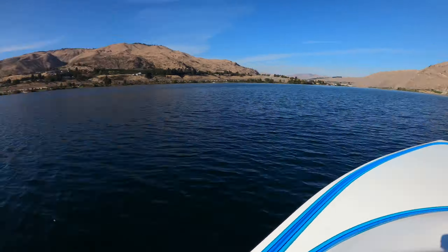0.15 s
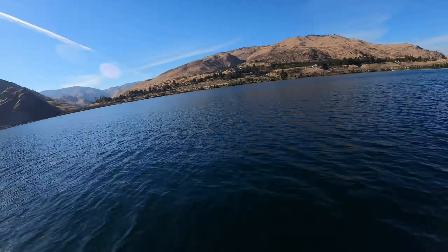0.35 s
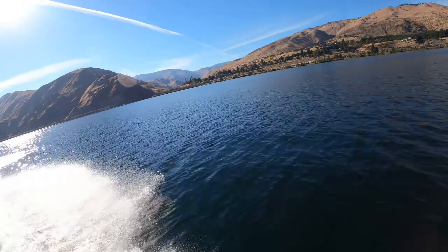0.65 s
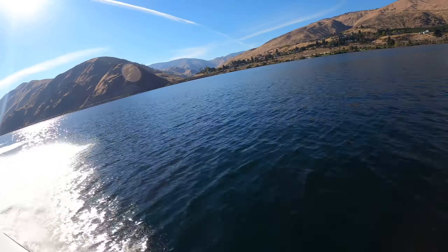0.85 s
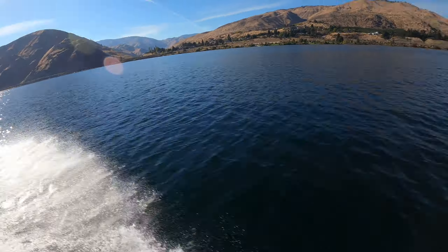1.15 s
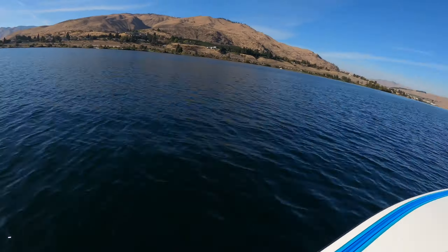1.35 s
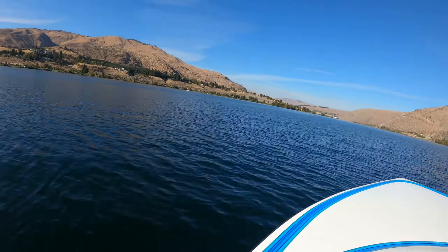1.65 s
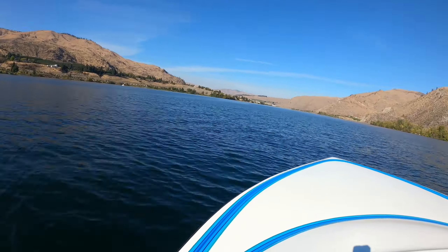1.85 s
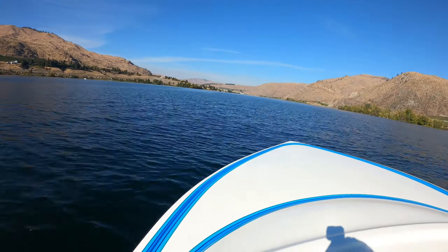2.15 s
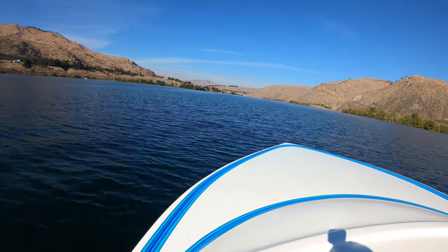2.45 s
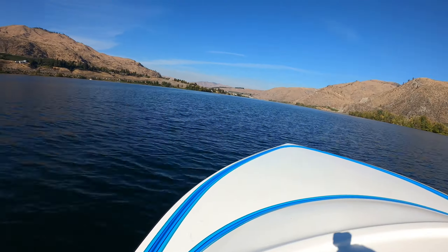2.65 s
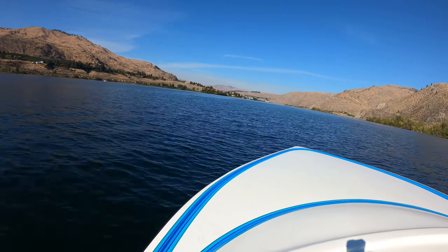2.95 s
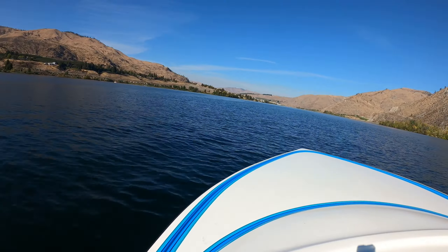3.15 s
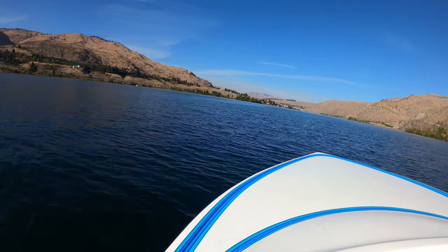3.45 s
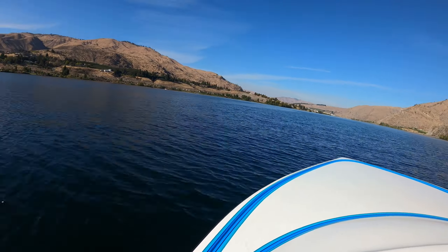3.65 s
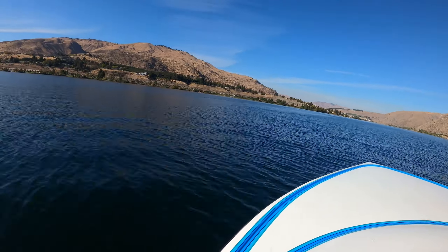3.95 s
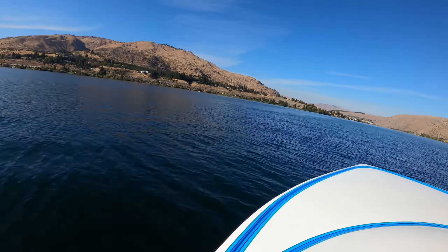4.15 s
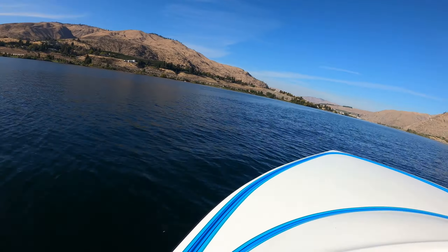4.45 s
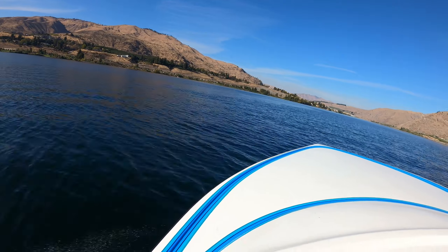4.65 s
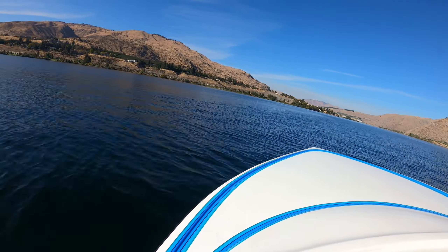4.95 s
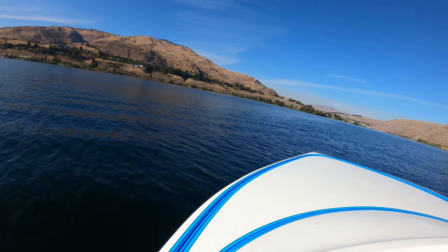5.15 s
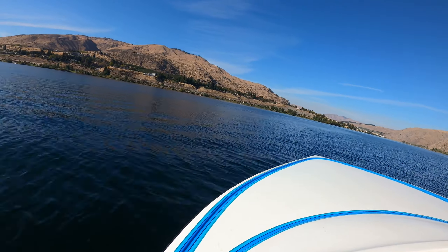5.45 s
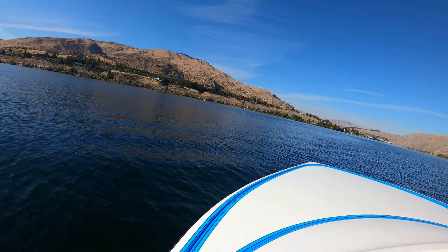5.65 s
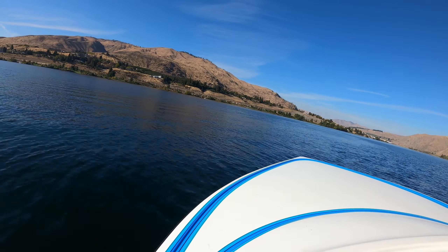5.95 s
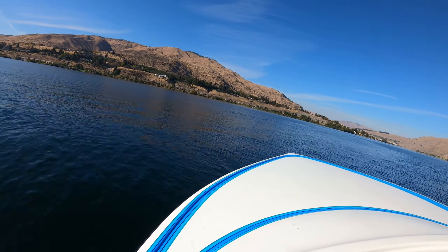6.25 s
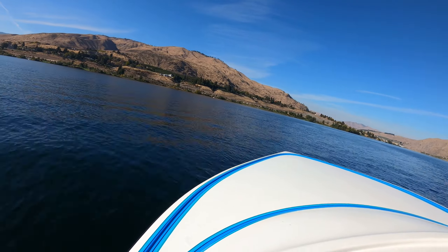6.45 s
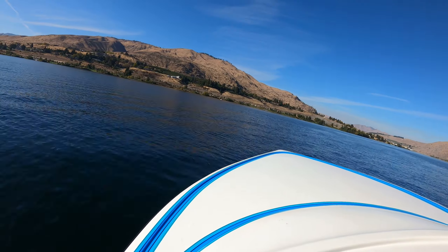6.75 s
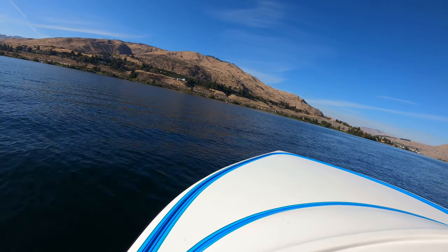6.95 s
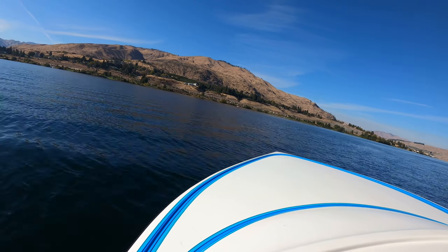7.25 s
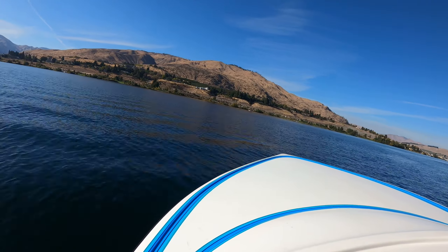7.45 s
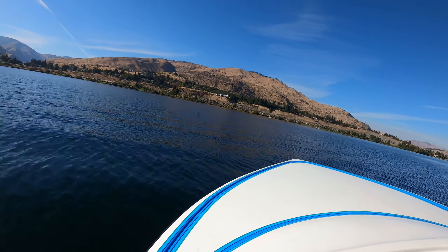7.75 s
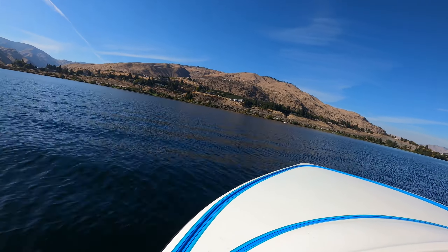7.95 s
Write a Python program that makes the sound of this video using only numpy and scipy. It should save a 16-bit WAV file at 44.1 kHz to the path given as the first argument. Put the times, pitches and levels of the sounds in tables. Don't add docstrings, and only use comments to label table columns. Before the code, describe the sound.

On a wide river, heard at the driver's head: a loud, low, buzzing engine note with rough water roar underneath. Early, the head turns into the airstream, giving ragged wind thumps, breathy hiss and sharp little spray ticks while the engine recedes. The wind drops away by two seconds. Steady cruising follows, then throttle surges around four and a half and five seconds lead to a sustained higher drone to the end.

```python
import sys
import numpy as np
from scipy import signal
from scipy.fft import rfft, irfft, next_fast_len
from scipy.io import wavfile
from scipy.ndimage import uniform_filter1d

SR = 44100
rng = np.random.default_rng(int(sys.argv[2]) if len(sys.argv) > 2 else 0)


def volts_from_decibels(level):
    exponent = np.asarray(level, float) / 20
    return 10 ** exponent


def store_pcm(level_fs):
    pcm = np.round(np.clip(level_fs, -1, 1) * 32767).astype(np.int16)
    wavfile.write(sys.argv[1], SR, np.atleast_2d(pcm).T)


N = 357210
TIME = np.arange(N) / SR

# (multiple of the cycle, level [dB])
CRUISE_TONES = [(1, -29), (2, -16), (3, 1), (4, -16.5), (5, -9.5), (6, -23.5), (7, -31.5), (8, 4),
                (9, -14.5), (10, -11.5), (11, -5), (12, -31.5), (13, -9), (14, -16), (15, -34), (16, -13),
                (17, -33.5), (18, -30.5), (19, -18.5), (20, -23), (21, -17), (22, -21.5), (23, -19.5),
                (24, -18.5), (25, -30), (26, -28), (27, -35), (28, -33.5), (29, -31.5), (30, -22)]
# (multiple of the cycle, level [dB])
PUSHED_TONES = [(1, -28), (2, -3), (3, 1), (4, -10), (5, -15), (6, -24.5), (7, -10.5), (8, 4), (9, -10),
                (10, -6.5), (11, -3), (12, -18), (13, -9.5), (14, -20.5), (15, -21.5), (16, -10),
                (17, -23.5), (18, -10.5), (19, -13.5), (20, -20), (21, -15.5), (22, -23), (23, -22.5),
                (24, -27), (25, -22), (26, -17), (27, -28.5), (28, -23.5), (29, -21.5), (30, -23.5)]
CRUISE_COMB_DB = [5.5, 2, -3, 5, 4, 4.5, -4, -6]
PUSHED_COMB_DB = [-1, 3.5, -6, 2.5, 6.5, -7.5, -0.5, -1]
FIRING_ORDER = np.array([1, 8, 4, 3, 6, 5, 7, 2])
# (frequency [Hz], gain [dB])
HULL = [(50, -6), (80, 0), (170, -4), (230, 0), (450, 0), (570, -6), (640, 0), (800, 0), (870, -7),
        (990, 0), (1250, 0), (1350, -5), (1700, -4), (2400, -10)]
# (frequency [Hz], density [dB per Hz])
ROAR_COLOUR = [(20, -29), (47, -10), (90, -5.5), (200, -12.5), (350, -14.5), (700, -18.5), (895, -24),
               (1050, -23.5), (1600, -28), (1780, -35), (4500, -59.5), (8000, -62.5), (10000, -71.5),
               (15500, -91.5)]
# (frequency [Hz], density [dB per Hz])
RASP_COLOUR = [(1900, -29.5), (2180, -3.5), (2300, -3), (2420, -15.5), (2800, -32)]
# (frequency [Hz], density [dB per Hz])
HISS_COLOUR = [(500, -26.5), (900, -2.5), (1800, -8), (3200, -14.5), (5000, -22), (7800, -31.5),
               (9500, -42), (12000, -51.5), (15500, -71.5)]
# (frequency [Hz], density [dB per Hz])
BUFFET_COLOUR = [(20, -11), (40, 2), (70, 0), (150, -1), (330, -2.5), (650, -15), (1200, -22),
                 (2500, -51.5)]
# (time [s], engine cycle rate [Hz])
LEVER = [(0, 32.22), (.4, 32.38), (.81, 33.3), (1.06, 36.02), (1.69, 32.55), (2.05, 31.96), (2.55, 32.41),
         (2.77, 33.49), (3.83, 32.49), (4.23, 33.53), (4.46, 39.13), (4.9, 35.02), (5.1, 38.53),
         (5.49, 35.16), (5.75, 38.42), (6.81, 38.78), (7.71, 39.4), (8.1, 40.14)]
# (peak time [s], rate change [Hz], half
# length [s])
SKIPS = [
    (0.24, -0.31, .18),
    (0.599, 1.3, .24),
    (1.874, .9, .18),
    (2.306, 0.84, .24),
    (3.266, -0.074, 0.24),
    (4.657, -0.3, 0.2016),
    (5.319, -0.66, 0.135),
    (6.075, -.35, .35),
    (7.221, 1.62, .58),
    (7.953, 0.84, 0.25),
]
# (time [s], level [dB], load [dB], head turned from the pipes [0-1, clipped])
EFFORT = [(0, -19, 0.5, 0.24), (.45, -20.5, 3.5, 0), (.6, -23, 4.5, 0.1), (1.1, -23, -0.5, 2.5),
          (1.35, -28.5, 3, 3), (1.65, -22.5, 0.5, 0.86), (2.05, -19, 0.5, 0.25), (3.1, -18.5, 2.5, 0.03),
          (3.83, -19.5, 2, 0.13), (4.26, -17.5, 2.5, 0.02), (4.45, -18.5, 0.5, 0.28),
          (4.88, -17.5, 4, 0.07), (5.1, -18, 2.5, 0.12), (5.55, -16, 3.5, 0.11), (5.75, -17.5, 2, 0.07),
          (6.8, -18, 3, 0), (7.35, -18, 3, 0.01), (8.1, -19.5, 3, 0)]
# (start [s], length [s], hiss [dB], brightness [dB], buffeting [dB])
GUSTS = [(0, .01, -49, -8, -13), (0.375, .03, -44, 3, -29), (0.396, 0.025, -38.5, -10, -27),
         (0.458, .025, -40, 4.5, -19), (0.499, .03, -36, -16, -18), (0.613, .15, -38, -11, -15),
         (0.782, 0.059, -37, -12.5, -19), (0.862, .09, -39.5, -4.5, -18), (.96, 0.087, -37.5, -12, -16),
         (1.084, 0.11, -38, -6.5, -17.5), (1.216, 0.054, -40.5, -7.5, -16), (1.272, .07, -41.5, -13.5, -15),
         (1.355, .015, -35, -12, -18), (1.399, 0.038, -39, -7.5, -17), (1.495, 0.053, -35.5, -10.5, -20.5),
         (1.587, 0.072, -39.5, 2, -31.5), (1.658, .04, -38.5, -6, -32.5), (1.724, 0.076, -42.5, -13, -23.5),
         (1.79, .22, -44, -9, -60), (3.98, .53, -48, -10, -61.5), (4.14, 0.21, -47.5, -7.5, -23),
         (4.85, 0.11, -50, -12, -50), (5.2, 1.53, -57.5, -1.5, -49), (5.46, 0.14, -55, -11, -50)]
# (time [s], peak [dB])
TICKS = [(0.3561, -36), (0.4243, -26), (0.5222, -27), (0.631, -30), (0.653, -27), (0.701, -19.5),
         (0.7405, -28), (0.7555, -26), (0.79, -31), (0.823, -26), (0.855, -24), (0.8584, -28), (1.037, -24),
         (1.0688, -28), (1.2785, -32), (1.2946, -35), (1.3268, -28), (1.3523, -31), (1.3694, -20),
         (1.4017, -22), (1.4486, -32), (1.4688, -30), (1.512, -31), (1.739, -33), (1.7992, -35),
         (4.017, -34), (4.0961, -33), (4.203, -40), (4.2428, -36), (4.4033, -35)]

CRUISE_HZ, PUSHED_HZ, OPENING_HZ = 32.57, 38.4, (33.4, 36.22)
# (start [dB], fall [dB per multiple])
CRUISE_TOP_DB, PUSHED_TOP_DB = (-29, .4), (-29, 0.31)
LOPE_DB, LOPE_DB_PER_LOAD_DB, BARK_DB, BARK_DB_PER_LOAD_DB = 1.05, 0.73, -7.5, 1.23
SHADE_DB = -8
TORN_DB, TORN_FROM_DB = 2.5, (-24, -22)
HISS_DB_PER_S, BUFFET_DB_PER_S = (630, 230), (300, 91)
CALM_DB, CALM_BRIGHT_DB, CALM_DB_PER_LOAD_DB, STILL_DB = -59, -6, 0.92, -45.5


def columns(table):
    s, *rest = np.transpose(table)
    return [np.interp(TIME, s, c) for c in rest]


def walk(rate_hz, time=TIME):
    steps = np.repeat(rng.standard_normal(int(N / SR * rate_hz) + 3), 8)
    smooth = uniform_filter1d(uniform_filter1d(steps, size=8), size=8)
    return 0.79 * np.interp(time * rate_hz * 8, np.arange(len(smooth)), smooth)


def bands(colour, source):
    size = next_fast_len(N)
    octave = np.log2(np.maximum(np.arange(size // 2 + 1) * SR / size, 1))
    hz, db = np.transpose(colour)
    shaped = rfft(source, size) * volts_from_decibels(np.interp(octave, np.log2(hz), db, left=-90, right=-90))
    shaped /= np.std(irfft(shaped, size))
    centres = np.arange(np.floor(np.log2(hz[0])), np.log2(hz[-1]) + 1)
    return [(2 ** c, irfft(shaped * np.clip(1 - abs(octave - c), 0, 1), size)[:N]) for c in centres]


def gusts(level_db, slopes_db_per_s):
    start, length = np.transpose(GUSTS)[:2, :, None]
    time = TIME[::32]
    rise_db_per_s = slopes_db_per_s[0] / (1 + length / .08)
    fade_db = rise_db_per_s * np.maximum(start - time, 0)
    fade_db = fade_db + slopes_db_per_s[1] * np.maximum(time - start - length, 0)
    return volts_from_decibels(2 * (level_db[:, None] - fade_db))


def wind(load_db):
    hiss_db, bright_db, buffet_db = np.transpose(GUSTS)[2:]
    blow = gusts(hiss_db, HISS_DB_PER_S)
    calm = volts_from_decibels(2 * (CALM_DB + CALM_DB_PER_LOAD_DB * load_db[::32]))
    total = blow.sum(axis=0) + calm
    mean_bright_db = (bright_db @ blow + CALM_BRIGHT_DB * calm) / total
    thump = gusts(buffet_db, BUFFET_DB_PER_S).sum(axis=0) + volts_from_decibels(2 * STILL_DB)
    coarse = 10 * np.log10(total), mean_bright_db, 10 * np.log10(thump)
    return [np.interp(TIME, TIME[::32], db) for db in coarse]


def hiss(level_db, bright_db):
    flutter = walk(70)
    grit = rng.standard_normal(N) * volts_from_decibels(2.6 * rng.exponential(size=N))
    out = 0
    for hz, part in bands(HISS_COLOUR, grit):
        tilt_db = (bright_db + 8.5) * np.clip(1.7 * np.log2(hz / 3400), 0, 1.3)
        out = out + part * volts_from_decibels(tilt_db + 2.206 * flutter + 0.53 * walk(25))
    return out * volts_from_decibels(level_db + 8.5)


def buffet(level_db):
    lump = walk(45)
    out = 0
    for _, part in bands(BUFFET_COLOUR, rng.standard_normal(N)):
        out = out + part * volts_from_decibels(0.6 * lump + 0.62 * walk(30))
    return out * volts_from_decibels(level_db)


def ticks():
    size, decay_s = 300, .0012
    out, t = np.zeros(N + size), np.arange(size) / SR
    chance = rng.standard_normal((len(TICKS), size))
    dull = signal.butter(4, [1600, 6800], "band", fs=SR, output="sos")
    for (s, db), noise in zip(TICKS, chance):
        body = signal.sosfilt(dull, noise * t * np.exp(-t / decay_s))
        at = int(s * SR)
        out[at:at + size] += volts_from_decibels(db - 3) * body / abs(body).max()
    return out[:N]


def roar(cycle, effort_db):
    puff = 1 + 0.18 * np.cos(8 * cycle) + 0.33 * np.cos(3 * cycle)
    out = 0
    for hz, part in bands(ROAR_COLOUR, rng.standard_normal(N)):
        out = out + part * volts_from_decibels(walk(8.3)) * (puff if hz > 400 else 1)
    return out * volts_from_decibels(effort_db - 11)


def rasp(hz, cycle, effort_db):
    push = np.interp(hz, [36, 40], [1, .3]) * np.interp(hz, [34, 35.3], [0, 1])
    ring = sum(part for _, part in bands(RASP_COLOUR, rng.standard_normal(N)))
    return ring * push * (1 + .5 * np.cos(8 * cycle)) * volts_from_decibels(effort_db - 35)


def revs():
    skips = 0
    for s, hz, half_s in SKIPS:
        skips = skips + hz * np.cos(np.pi / 2 * np.clip((TIME - s) / half_s, -1, 1)) ** 2
    return uniform_filter1d(columns(LEVER)[0], size=2600) + skips


def hull_db(hz):
    return np.interp(hz, *np.transpose(HULL))


def ladder(table, top_db, comb_db, at_hz, count=36):
    step = np.arange(1, count + 1)
    k = len(table) + step
    db = top_db[0] - top_db[1] * step + hull_db(k * at_hz) + np.array(comb_db)[k % 8]
    return list(table) + list(zip(k, db))


def exhaust(*controls):
    hz, cycle, firing_db, lope_db, bark_db, shade_db = (c[::4] for c in controls)
    time = TIME[::4]
    push = np.interp(hz, OPENING_HZ, [0, 1])
    near_db = -6 * (1 - FIRING_ORDER % 2) - .5 * (4 - (FIRING_ORDER + 1) // 2) ** 2
    pattern = np.angle(np.fft.fft(volts_from_decibels(near_db)))
    scatter = rng.uniform(0, 2 * np.pi, 66)
    easy = ladder(CRUISE_TONES, CRUISE_TOP_DB, CRUISE_COMB_DB, CRUISE_HZ)
    hard = ladder(PUSHED_TONES, PUSHED_TOP_DB, PUSHED_COMB_DB, PUSHED_HZ)
    out = 0
    for (k, easy_db), (_, hard_db), chance in zip(easy, hard, scatter):
        if k < 6:
            family_db = lope_db
        elif k < 9:
            family_db = firing_db
        elif k < 15:
            family_db = firing_db + shade_db
        else:
            family_db = bark_db + 7
        easy_db = easy_db - hull_db(k * CRUISE_HZ)
        hard_db = hard_db - hull_db(k * PUSHED_HZ)
        db = family_db + easy_db + push * (hard_db - easy_db) + hull_db(k * hz)
        if k < 25:
            lag = pattern[int(k) % 8] + .3 * k ** 2 + .33 * max(k - 14, 0) ** 2
        else:
            lag = chance
        level = np.sqrt(2) * volts_from_decibels(db + (0.41 + 0.028 * k) * walk(14, time))
        out = out - level * np.cos(k * cycle - lag + .009 * k * walk(18, time))
    return signal.resample_poly(out, up=4, down=1, window=("kaiser", 12.))[:N]


def scene():
    hz = revs()
    level_db, load_db, turned = columns(EFFORT)
    hiss_db, bright_db, buffet_db = wind(load_db)
    torn_db = np.interp(buffet_db, TORN_FROM_DB, [0, TORN_DB])
    firing_db = level_db + torn_db * walk(14)
    lope_db = level_db + LOPE_DB + LOPE_DB_PER_LOAD_DB * load_db + torn_db * (walk(15) - .8)
    bark_db = level_db + BARK_DB + BARK_DB_PER_LOAD_DB * load_db + .5 * torn_db * (1 + walk(6.8))
    shade_db = SHADE_DB * np.clip(turned, 0, 1)
    cycle = 2 * np.pi * np.cumsum(hz) / SR
    engine = exhaust(hz, cycle, firing_db, lope_db, bark_db, shade_db)
    engine = engine + roar(cycle, bark_db + 12.5) + rasp(hz, cycle, bark_db + 11)
    return (engine + hiss(hiss_db, bright_db) + buffet(buffet_db) + ticks())[None]


def top_cut(x):
    return signal.sosfilt(signal.butter(12, 15100, fs=SR, output="sos"), x)


def record(dry):
    power = uniform_filter1d(uniform_filter1d(dry ** 2, size=1300), size=1300)
    loud_db = 10 * np.log10(power + 1e-9)
    even = dry * volts_from_decibels(-.35 * (loud_db + 11))
    mix = np.tanh(0.65 * even) / 0.72
    return top_cut(mix)


dry = scene()
out = record(dry)
store_pcm(out)
```